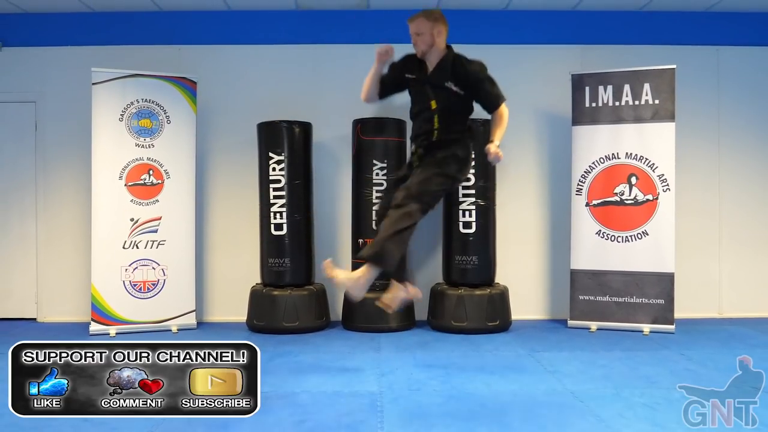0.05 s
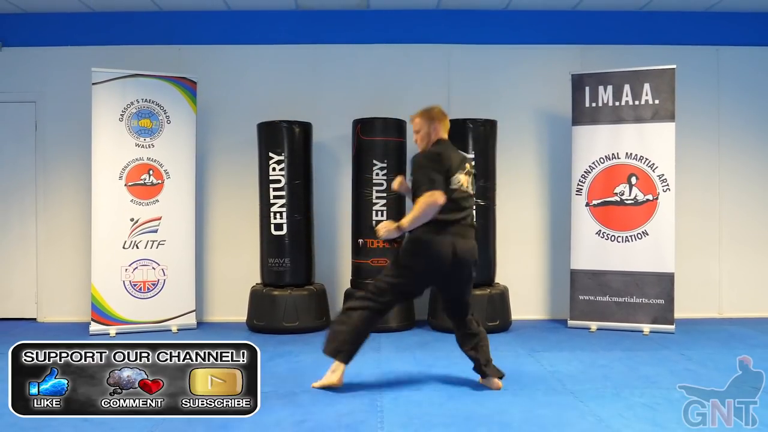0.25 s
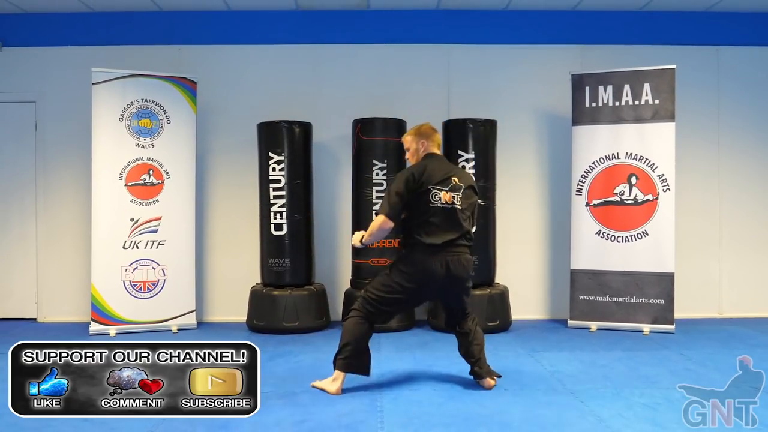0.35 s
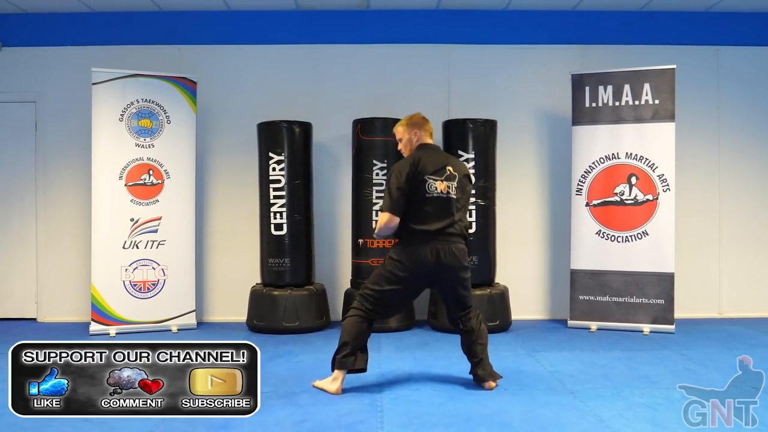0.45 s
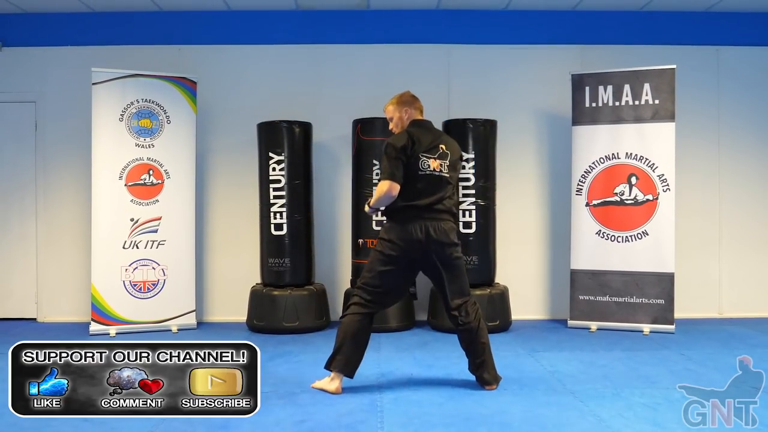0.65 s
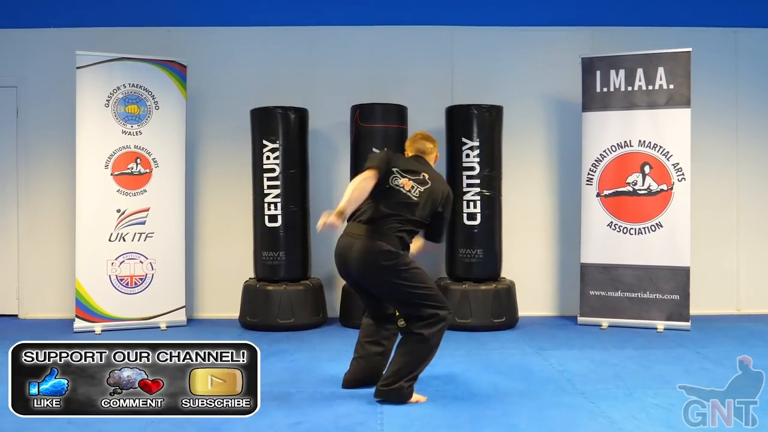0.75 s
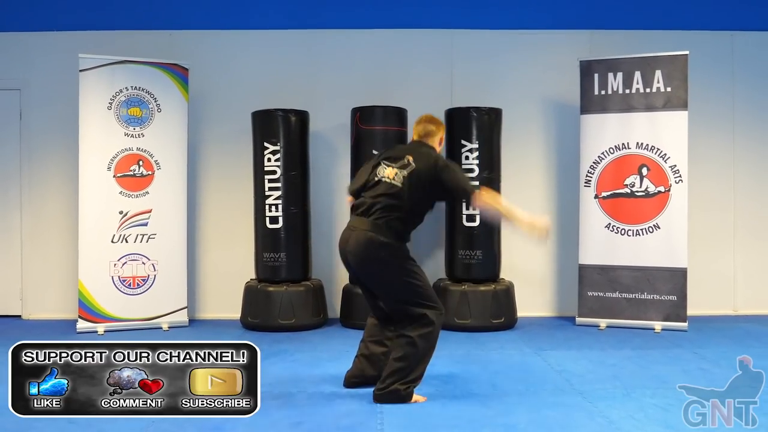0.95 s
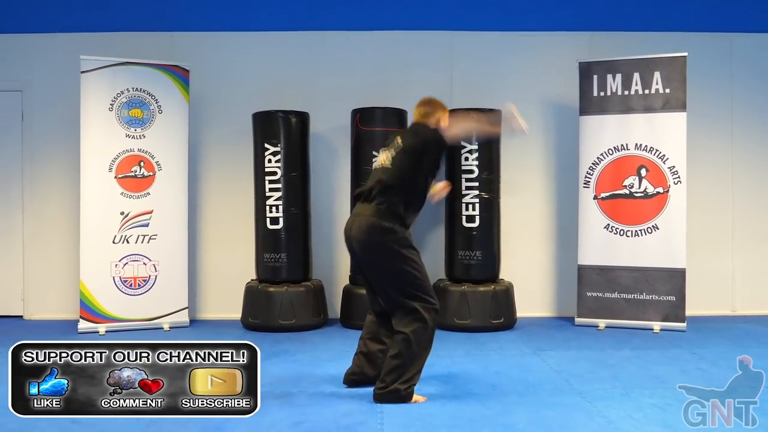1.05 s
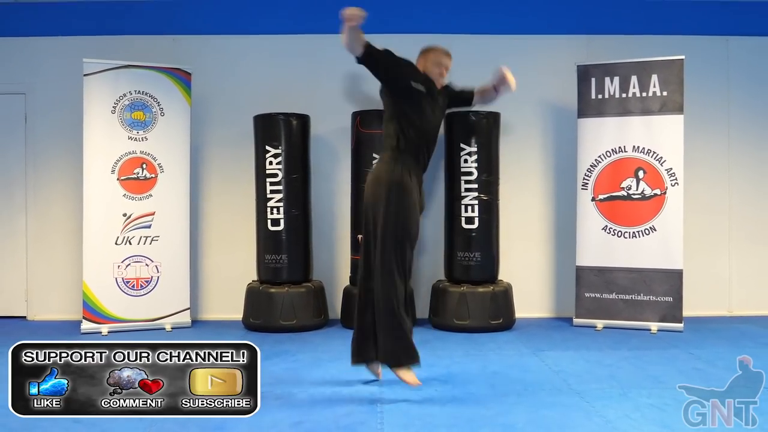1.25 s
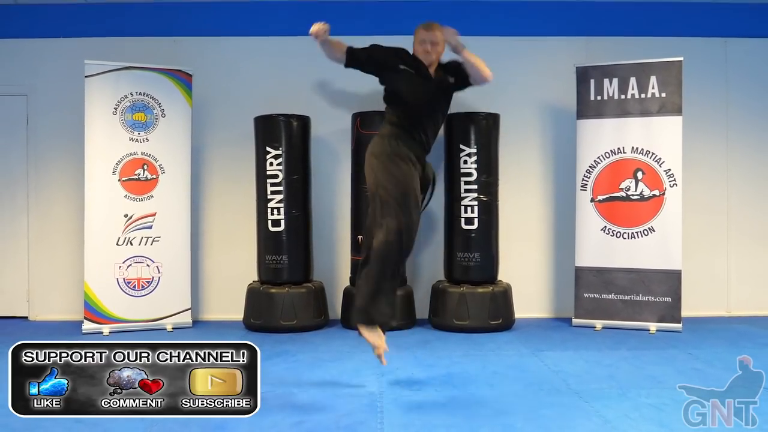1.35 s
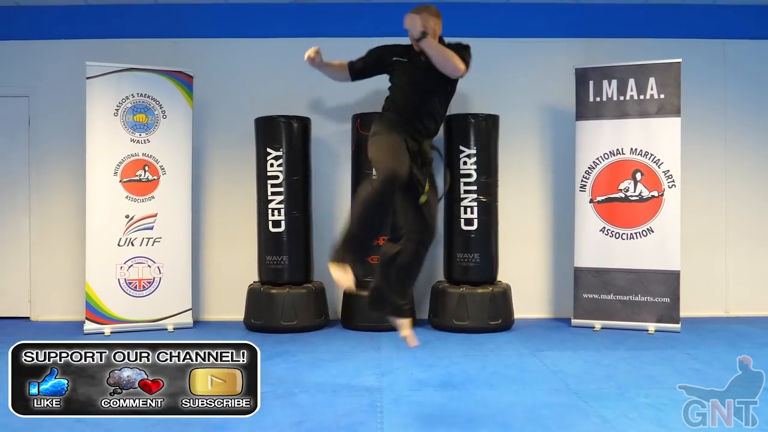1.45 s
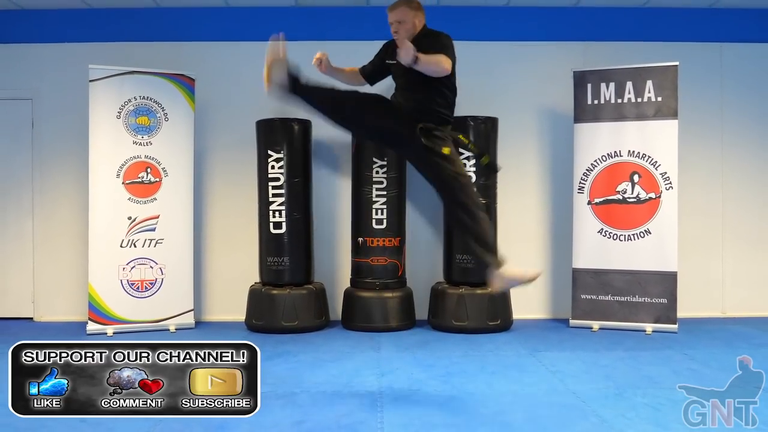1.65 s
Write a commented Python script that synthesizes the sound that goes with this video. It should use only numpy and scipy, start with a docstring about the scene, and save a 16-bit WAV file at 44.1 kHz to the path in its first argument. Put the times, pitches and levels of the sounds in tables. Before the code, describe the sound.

A barefoot landing thuds on padded mats over a sprung floor, ringing briefly off the gym walls. Then come quieter, muffled shuffles and thumps, a low floor rumble, rustling cloth and a quick scrape of a sole.

```python
"""An echoing gym is still fading from a take-off when, at 0.24 s, bare feet land on foam mats.
Toes, ball and heel slap down, the sprung floor thuds, the walls answer and the soles slide to rest.
At 0.8 s the scene changes to a duller one: feet shuffle and thump, the floor rumbles, a suit rustles.
Near 1.35 s a foot scrapes off for the next jump."""
import sys
import numpy as np
from scipy import signal
from scipy.fft import rfft, irfft
from scipy.io import wavfile

SR = 44100
rng = np.random.default_rng(int(sys.argv[2]) if len(sys.argv) > 2 else 0)


def log_audio(samples):
    """Write samples as a 16-bit WAV file to the path given in sys.argv[1]."""
    # one column per channel
    frames = np.atleast_2d(samples).T
    # limit to full scale, then quantise
    limited = np.clip(frames, -1, 1)
    pcm = np.round(limited * 32767).astype(np.int16)
    wavfile.write(sys.argv[1], SR, pcm)


N = 74970

# Room tone of each scene. Each row: frequency in Hz, relative spectral density in dB.
LANDING_TONE = [(18, -26), (30, 10), (154, -12), (312, -12.5), (735, -30.5), (1520, -21), (2630, -26),
                (3590, -35), (6040, -33), (15000, -35)]
SHUFFLE_TONE = [(94, -30), (160, -5), (246, -18), (463, -16), (606, -0.5), (853, -9.5), (1020, -10.5),
                (1720, -12), (2100, -19.5), (11800, -36), (15300, -69), (22000, -120)]
# First wall reflections. Each row: delay in ms, gain in dB.
WALL_ECHOES = [(4.4, -33.5), (11.1, -13), (12.4, -9.5), (15.3, -10), (27, -25.5)]
# Diffuse tail of the hall. Each row: band centre in Hz, level in dB, 60 dB decay time in seconds.
HALL_BANDS = [(63.2, -35, .35), (107.6, -32.5, 0.51), (219, -32, .65), (378, -35, 0.57), (534, -39, 0.44),
              (774, -35.5, 0.38), (1100, -39, 0.59), (1650, -40, 0.77), (2600, -46.5, 0.87),
              (3540, -40.5, 0.78), (5000, -38.5, 0.82), (8000, -41, 0.72), (14000, -37, .5)]
# Spectra of the noise sources. Each row: frequency in Hz, relative spectral density in dB.
TAKEOFF_SPECTRUM = [(18, -69), (30, -29), (87, 8), (122, -10), (163, 4.5), (281, -5), (312, -8),
                    (404, -4.5), (460, -12), (815, -11), (881, -13), (1300, -13), (1730, -21.5),
                    (15000, -40.5)]
RUMBLE_SPECTRUM = [(15, -47), (25, 20.5), (38, -7), (86, 10), (127, 0.5), (162, -11), (244, -8.5),
                   (300, -4), (390, -44), (660, -120)]
RUSTLE_SPECTRUM = [(88, -53), (150, 2), (270, -2), (370, 4), (435, 2), (566, -6), (947, -9), (3000, -27.5),
                   (3900, -77), (6600, -120)]
SCRAPE_SPECTRUM = [(1180, 1), (2000, 0.5), (2210, -5), (3550, -6.5), (6000, -23.5), (7800, -37),
                   (13200, -120)]
SCRAPE_HISS_SPECTRUM = [(3530, -21), (6000, -5), (8310, -11), (10500, -16.5), (11800, -25), (15300, -49),
                        (22000, -120)]
SLIDE_SPECTRUM = [(1180, -22.5), (2000, -3), (2920, -6), (3670, 7), (4180, -4.5), (15500, -22.5)]
# Shuffling. Each row: time in seconds, then floor rumble, suit rustle, sole scrape and its hiss in dB.
MOVEMENT_LEVELS = [(.80, -38.5, -56, -77, -77), (.95, -52, -68, -60, -72.5), (0.989, -50, -45, -66, -72),
                   (1.06, -49, -56, -69, -78), (1.13, -36.5, -53.5, -68, -73), (1.24, -42, -57, -62, -75),
                   (1.28, -51, -50, -62, -74), (1.31, -39, -56, -61, -67), (1.328, -42, -34.5, -41.5, -46),
                   (1.338, -37.5, -29, -46, -59.5), (1.348, -38.5, -56, -46.5, -58),
                   (1.365, -53, -35, -42, -65), (1.379, -52, -33, -39.5, -49.5),
                   (1.387, -48, -32.5, -58, -67), (1.405, -41, -38.5, -41.5, -66),
                   (1.432, -32, -52, -55, -73), (1.51, -44, -47, -55.5, -79), (1.558, -38, -50, -63, -75.5),
                   (1.64, -44.5, -53.5, -57, -69), (1.70, -47, -49.5, -51.5, -66.5)]
# Soles settling after the landing. Each row: time in seconds, hiss level in dB.
SLIDE_LEVELS = [(.243, -44), (.255, -39), (.278, -57), (.30, -41), (.36, -57.5), (.43, -58.5), (.47, -59),
                (.56, -90)]
# Modes of the sprung floor and of the mat (the mat's before scaling by pitch).
# Each row: frequency in Hz, relative level in dB, 60 dB decay time in seconds.
FLOOR_MODES = [(57.4, -3.5, 0.18), (99, -14, 0.153), (115, -9, 0.088), (139, -12, 0.3),
               (213.6, -7.5, 0.077), (230.4, -11, 0.26)]
MAT_MODES = [(383, -18, 0.017), (620, -34, 0.078), (635, -42, 0.029), (806, -9.5, 0.027), (851, -10, 0.037),
             (1060, -11, 0.029), (1193, -11, 0.027), (1570, -15, 0.0314), (2190, -15, .012)]
# Light foot thumps and scuffs. Each row: start in seconds, level in dB, pulse length in ms,
# floor thud gain in dB, floor push time in ms, treble crack gain in dB.
SHUFFLE_STEPS = [(.803, -49, 0.97, -56, 6.6, -46), (.978, -35, 1.8, -56, 4.3, -64),
                 (1.014, -47, 2.9, -43, 2.5, -66), (1.060, -43, 2.3, -39.5, 1.9, -53),
                 (1.103, -48, 2, -35.5, 9.4, -66), (1.129, -33.5, 1.6, -45, 1, -69),
                 (1.163, -64, 2.1, -61, 2.2, -79), (1.200, -40, 2.2, -42, 4.5, -62),
                 (1.2112, -33, 0.89, -50, 3.3, -57), (1.294, -35, 5.4, -28, 4.3, -60),
                 (1.319, -30, 0.27, -30, 5.2, -58), (1.329, -29, 1.08, -42, 3.2, -50),
                 (1.337, -32.5, 0.87, -38, 4, -43), (1.359, -37, 0.75, -40, 1.5, -29),
                 (1.3645, -29, 1.3, -46, 3, -44), (1.376, -32, .6, -48, 3, -43),
                 (1.3785, -32, .4, -48, 3, -39), (1.380, -25.5, 3.1, -28.5, 3.7, -66),
                 (1.3955, -36, .6, -48, 3, -48), (1.4025, -31, 1.5, -42, 4, -43),
                 (1.423, -40, .5, -50, 4, -52), (1.447, -28, 4.5, -36, 6.7, -51),
                 (1.480, -28, 4.75, -52, 4.5, -62), (1.506, -26, 6.5, -53, 5, -47),
                 (1.637, -39, 1.17, -33, 3, -68), (1.684, -29.5, 4.75, -41, 17, -65)]
# Foot slaps and their first quick echoes off the walls. Each row: as for the steps.
SLAPS_AND_ECHOES = [(.2426, -18, .7, -21, 3, -33), (.2475, -23, 2.5, -20, 3, -44),
                    (.2533, -30, .4, -28, 5, -38), (.2576, -25, .9, -30, 5, -39),
                    (.2827, -5, .75, -14, 7, -23), (.2836, -12, .35, -30, 7, -26),
                    (.2936, -19, .45, -24, 7, -28), (.3306, -4, .55, -27, 2.5, -20),
                    (.3344, -12, .3, -36, 3, -23), (.3693, -19, .9, -36, 3, -37)]

HALL_RISE_S, ECHO_TOP_HZ = 0.0041, 5200
TAKEOFF_DB, TAKEOFF_FADE_DB_PER_S = -49, 24.5
CRACK_BAND_HZ, CRACK_T60_S = (1500, 6180), .005  # at pitch = 1
PRESENCE_HZ, PRESENCE_WIDTH_HZ, PRESENCE_DB = 3600, 1100, 10
SHUFFLE_HALL_DB, SHUFFLE_TOP_HZ = -4, 11900
CHANGE_S, CROSSFADE_S = .800, 0.0045


def undb(db):
    """Decibels express an amplitude ratio logarithmically."""
    return 10 ** (np.asarray(db) / 20)


def colour(x, spectrum):
    """Spectral shaping: x is filtered, 30 dB per octave down outside the table, and set to unit RMS."""
    hz, db = np.array(spectrum).T
    f = np.maximum(np.arange(len(x) // 2 + 1) * SR / len(x), 1)
    octaves_outside = np.maximum(np.log2(hz[0] / f), 0) + np.maximum(np.log2(f / hz[-1]), 0)
    gain = undb(np.interp(np.log(f), np.log(hz), db) - 30 * octaves_outside)
    shaped = irfft(rfft(x) * gain, len(x))
    return shaped / np.sqrt(np.mean(shaped ** 2))


def noise(spectrum, db):
    """Filtered white noise takes on the filter's spectrum; db is a level or an envelope."""
    return undb(db) * colour(rng.standard_normal(N), spectrum)


def convolve(x, response):
    """A linear system answers with the convolution of its input and its impulse response."""
    return signal.fftconvolve(x, response)[:N]


def hall_response():
    """Reverberation: discrete wall echoes and a diffuse tail that decays exponentially in each band."""
    t = np.arange(SR) / SR
    log_f = np.log(np.maximum(np.arange(SR // 2 + 1), 1.))
    log_centres = np.log(np.array(HALL_BANDS)[:, 0])
    tail = 0
    for k, (_, db, t60) in enumerate(HALL_BANDS):
        power_share = np.interp(log_f, log_centres, np.arange(len(HALL_BANDS)) == k)
        band = irfft(rfft(rng.standard_normal(SR)) * np.sqrt(power_share), SR)
        tail += undb(db) * band * 1000. ** (-t / t60) * (1 - np.exp(-t / HALL_RISE_S))
    echoes = sum(undb(db) * np.sinc(np.arange(SR) - ms * SR / 1000) for ms, db in WALL_ECHOES)
    return tail + signal.lfilter(*signal.butter(1, ECHO_TOP_HZ, fs=SR), echoes)


def takeoff_tail(t):
    """Reverberant decay: the hall sound of the take-off loses equal decibels in equal times."""
    return noise(TAKEOFF_SPECTRUM, TAKEOFF_DB - TAKEOFF_FADE_DB_PER_S * t)


def friction(contacts_per_s, hiss, scatter_db=2.5):
    """Friction as shot noise: tiny random contacts, most weak and a few strong, over a smooth hiss."""
    chance, polarity, size = rng.random((N, 3)).T
    strength = undb(-scatter_db * np.log(size + 1e-9))
    contacts = (chance < contacts_per_s / SR) * np.sign(polarity - .5) * strength
    return contacts + hiss * rng.standard_normal(N)


def suit_rustle(db):
    """Friction of cloth gives a grainy noise, strongest in the low middle range."""
    return undb(db) * colour(friction(contacts_per_s=1200, hiss=0.19), RUSTLE_SPECTRUM)


def sole_scrape(scrape_db, hiss_db):
    """Friction of a sole on the mat drives both a midrange scrape and a high hiss."""
    rub = friction(contacts_per_s=3000, hiss=0.76)
    scrape = undb(scrape_db) * colour(rub, SCRAPE_SPECTRUM)
    return scrape + undb(hiss_db) * colour(rub, SCRAPE_HISS_SPECTRUM)


def sole_slide(t):
    """Sliding friction hisses as the soles settle on the mat."""
    times, db = np.array(SLIDE_LEVELS).T
    return noise(SLIDE_SPECTRUM, np.interp(t, times, db, left=-120, right=-120))


def ring(modes, pitch=1):
    """Modal superposition: a struck body rings as damped sines; pitch below 1 lowers and slows them."""
    t = np.arange(SR // 2) / SR * pitch
    return sum(undb(db) * np.sin(2 * np.pi * hz * t) * 1000. ** (-t / t60) for hz, db, t60 in modes)


def pulse(t, ms):
    """Time and bandwidth trade off: the shorter this sine-squared pulse, the wider its spectrum."""
    return np.sin(np.pi * np.clip(t * 1000 / ms, 0, 1)) ** 2


def foot_sounds(events, mat_db, pitch):
    """Impact excitation: a pressure dip rings the mat, a push rings the floor, a noise burst cracks."""
    pressure, push, crack = np.zeros((3, N + SR))
    t = np.arange(2048) / SR
    for start, db, pulse_ms, thud_db, push_ms, crack_db in events:
        onset = int(start * SR)
        span = slice(onset, onset + len(t))
        since_start = t - (start - onset / SR)
        pressure[span] -= undb(db) * pulse(since_start, pulse_ms)
        force = pulse(since_start, push_ms)
        push[span] += undb(thud_db) * force / force.sum()
        crack[span] += undb(crack_db) * rng.standard_normal(len(t)) * 1000. ** (-t * pitch / CRACK_T60_S)
    pressure = signal.sosfilt(signal.butter(1, 120, "high", fs=SR, output="sos"), pressure)
    crack_band = signal.butter(1, np.array(CRACK_BAND_HZ) * pitch, "band", fs=SR, output="sos")
    crack = signal.sosfilt(crack_band, crack)
    mat = convolve(pressure, ring(MAT_MODES, pitch)) * 2 * np.pi * 1000 / SR
    floor = convolve(push, ring(FLOOR_MODES))
    return pressure[:N] + undb(mat_db) * mat + floor + crack[:N]


def shuffling(hall, t):
    """Superposition of steps, hall, rumble, rustle, room tone and scrape, dulled by a low-pass filter."""
    times, *levels = np.array(MOVEMENT_LEVELS).T
    rumble_db, rustle_db, scrape_db, hiss_db = (np.interp(t, times, db) for db in levels)
    steps = foot_sounds(SHUFFLE_STEPS, mat_db=-14, pitch=0.724)
    x = steps + undb(SHUFFLE_HALL_DB) * convolve(steps, hall)
    x += noise(RUMBLE_SPECTRUM, rumble_db)
    x += suit_rustle(rustle_db)
    x += noise(SHUFFLE_TONE, db=-56)
    x += sole_scrape(scrape_db, hiss_db)
    return signal.sosfilt(signal.ellip(10, .2, 60, SHUFFLE_TOP_HZ, fs=SR, output="sos"), x)


def landing(hall, t):
    """Resonance: a microphone's presence peak brightens slaps and hall; slide and room tone are added."""
    slaps_and_echoes = foot_sounds(SLAPS_AND_ECHOES, mat_db=-10, pitch=0.97)
    x = slaps_and_echoes + convolve(slaps_and_echoes, hall) + takeoff_tail(t)
    presence = signal.iirpeak(PRESENCE_HZ, PRESENCE_HZ / PRESENCE_WIDTH_HZ, fs=SR)
    x += (undb(PRESENCE_DB) - 1) * signal.lfilter(*presence, x)
    return x + sole_slide(t) + noise(LANDING_TONE, db=-57.5)


def scene():
    """A short linear cross-fade leads from the landing to the shuffling in the same hall."""
    t = np.arange(N) / SR
    hall = hall_response()
    blend = np.clip((t - CHANGE_S) / CROSSFADE_S + .5, 0, 1)
    mix = (1 - blend) * landing(hall, t) + blend * shuffling(hall, t)
    fade_out = np.sin(np.pi / 2 * np.clip((N - 40 - np.arange(N)) / 200, 0, 1)) ** 2
    return (mix * fade_out)[None]


def record(dry):
    """Band limiting: filters remove the deepest bass and the highest treble."""
    x = signal.sosfilt(signal.butter(3, 43, "high", fs=SR, output="sos"), dry)
    return signal.sosfilt(signal.ellip(10, .2, 70, 16300, fs=SR, output="sos"), x)


dry = scene()
out = record(dry)
log_audio(out)
```